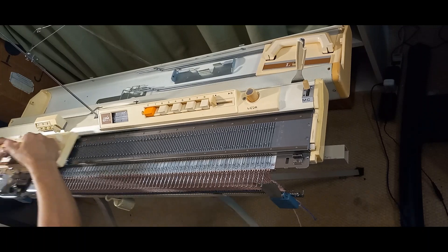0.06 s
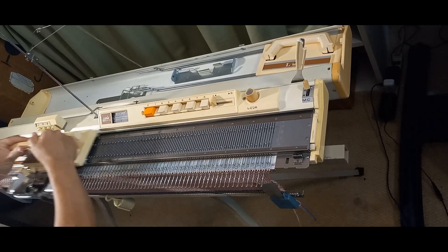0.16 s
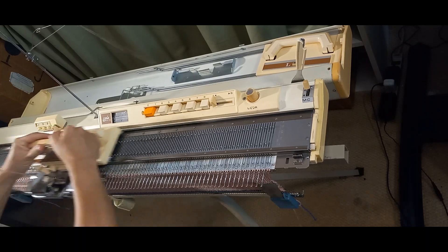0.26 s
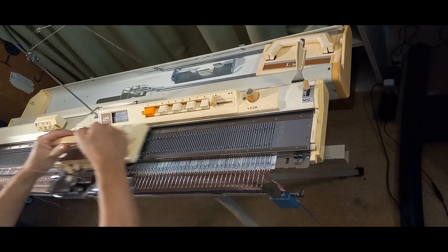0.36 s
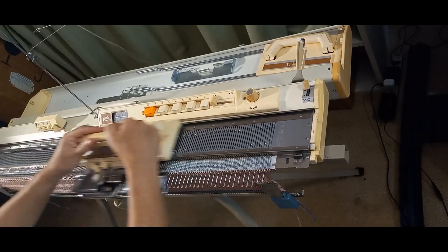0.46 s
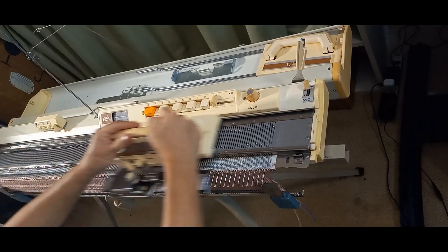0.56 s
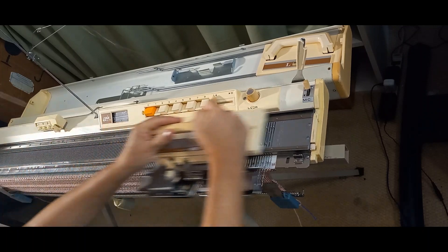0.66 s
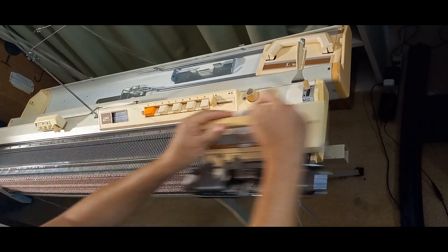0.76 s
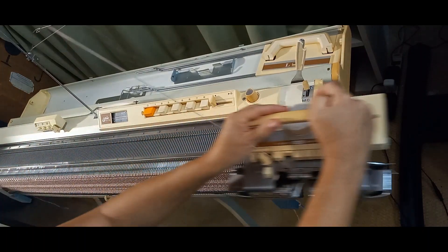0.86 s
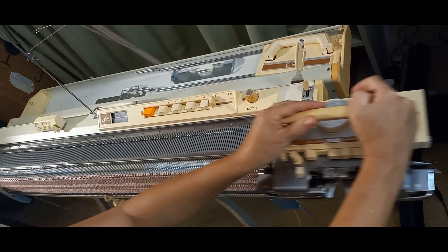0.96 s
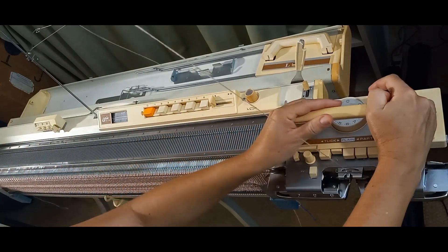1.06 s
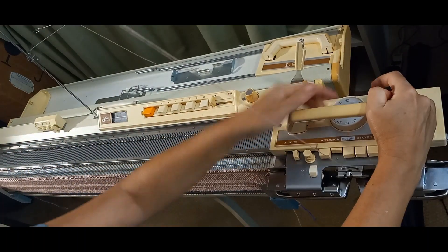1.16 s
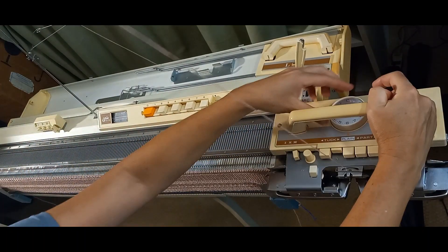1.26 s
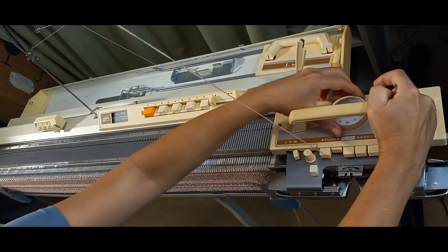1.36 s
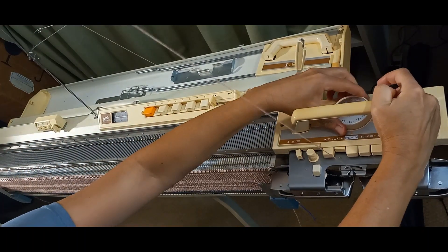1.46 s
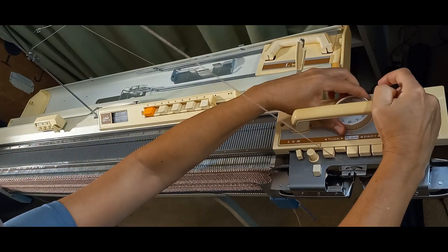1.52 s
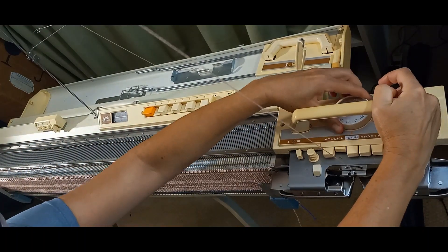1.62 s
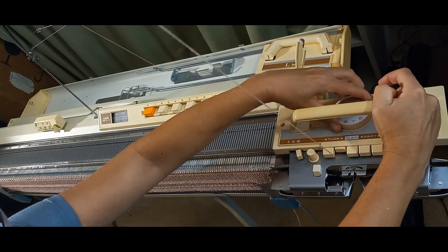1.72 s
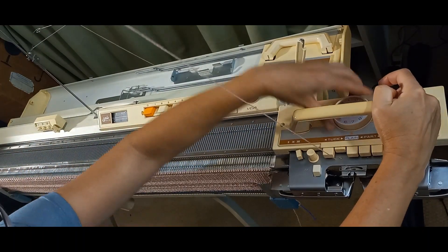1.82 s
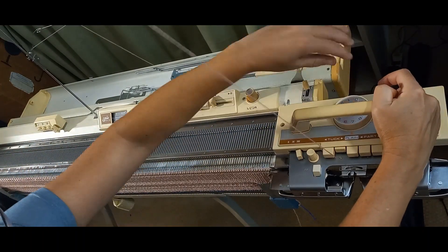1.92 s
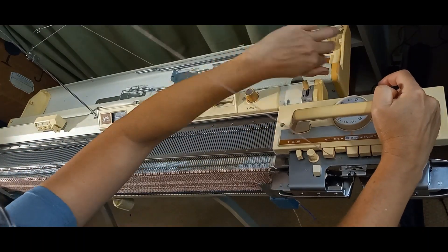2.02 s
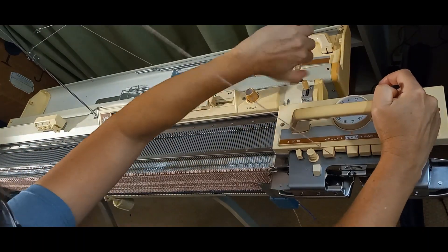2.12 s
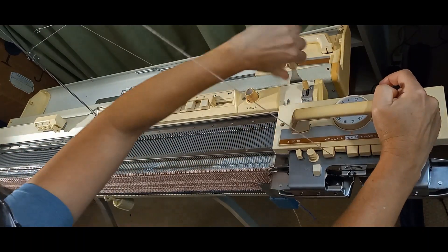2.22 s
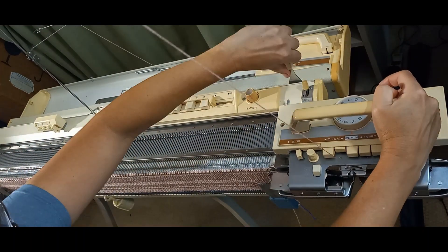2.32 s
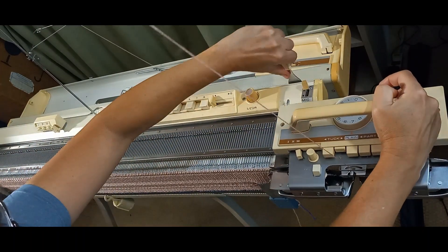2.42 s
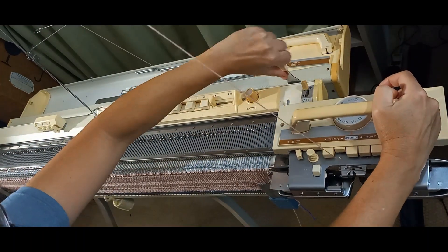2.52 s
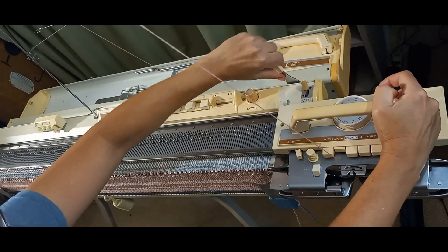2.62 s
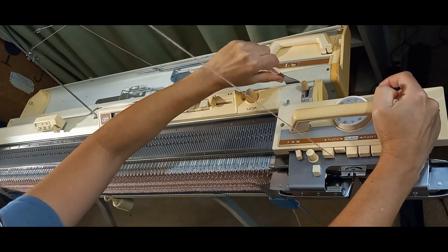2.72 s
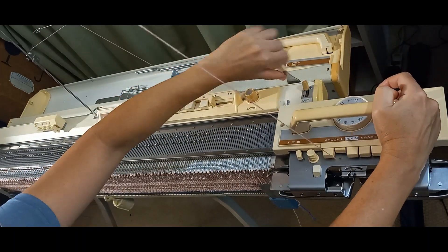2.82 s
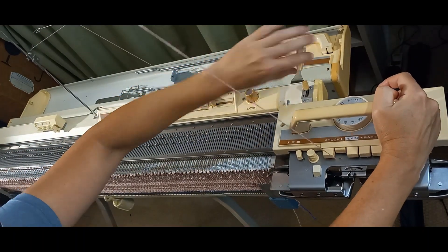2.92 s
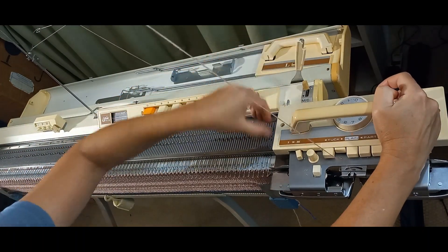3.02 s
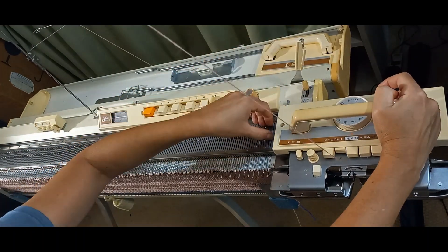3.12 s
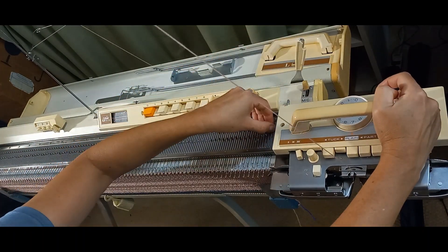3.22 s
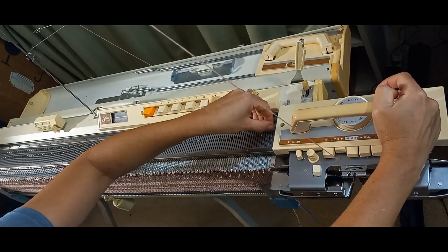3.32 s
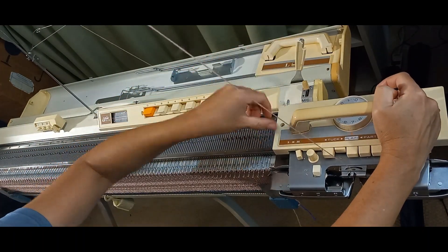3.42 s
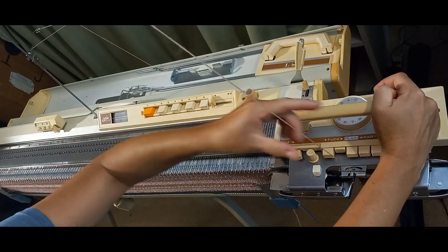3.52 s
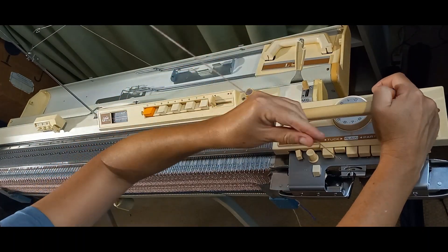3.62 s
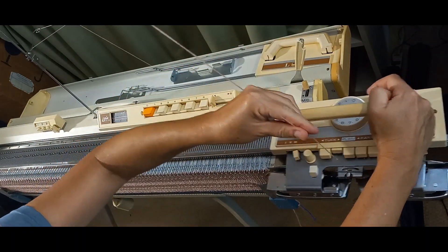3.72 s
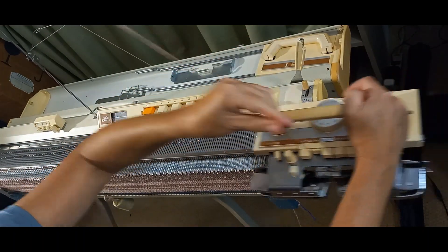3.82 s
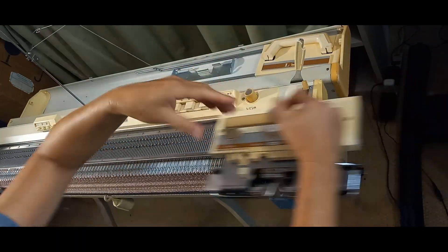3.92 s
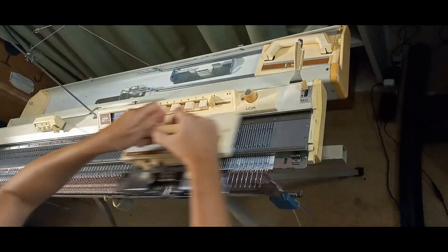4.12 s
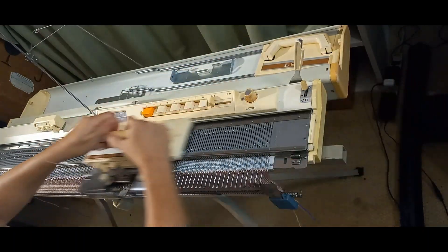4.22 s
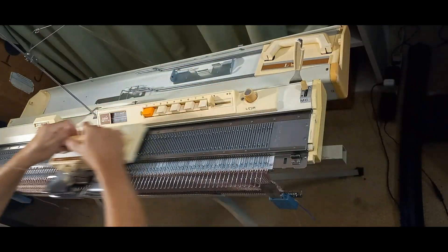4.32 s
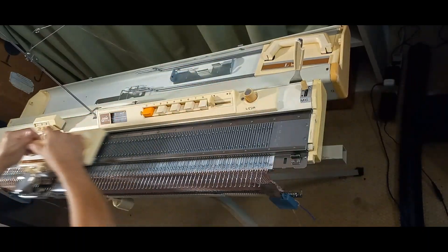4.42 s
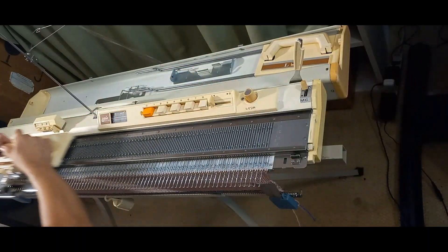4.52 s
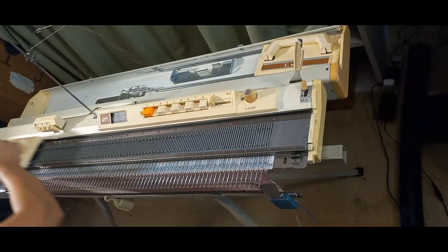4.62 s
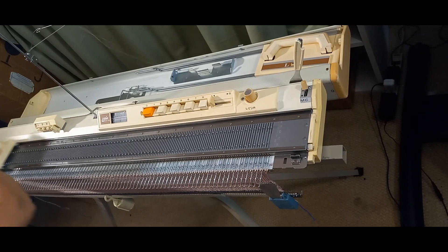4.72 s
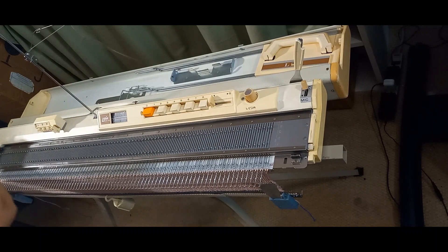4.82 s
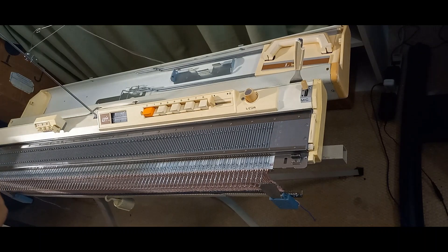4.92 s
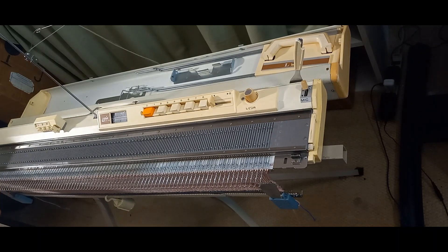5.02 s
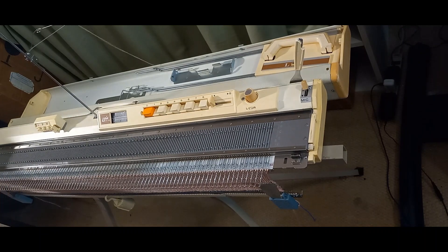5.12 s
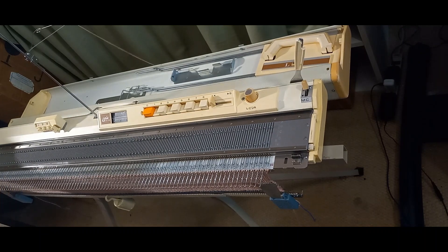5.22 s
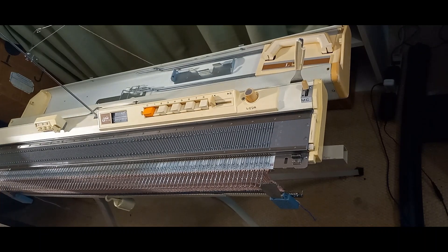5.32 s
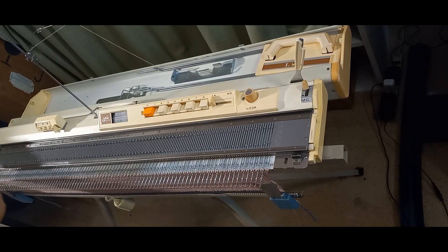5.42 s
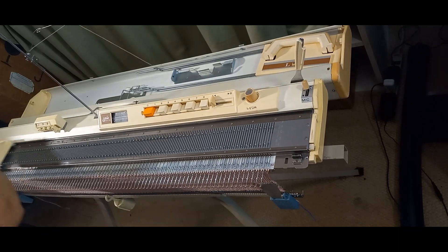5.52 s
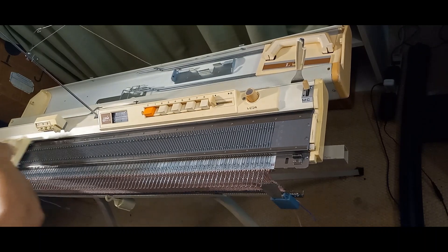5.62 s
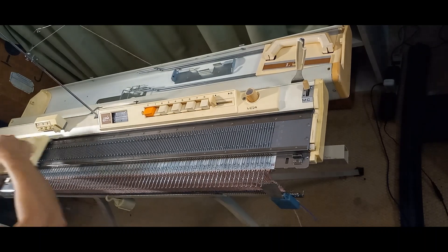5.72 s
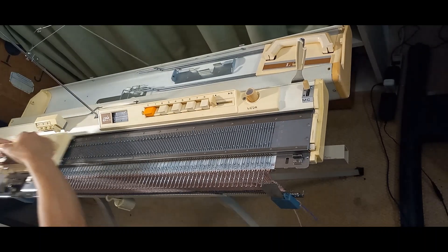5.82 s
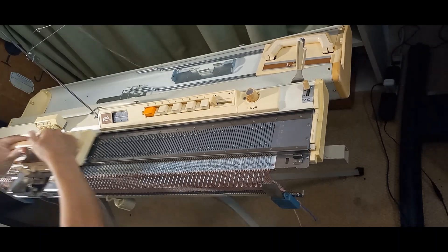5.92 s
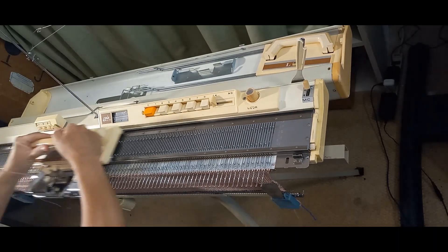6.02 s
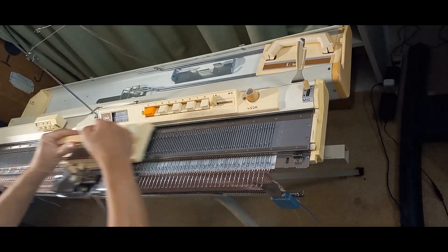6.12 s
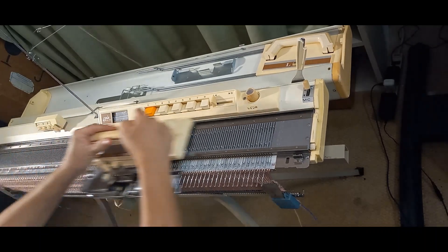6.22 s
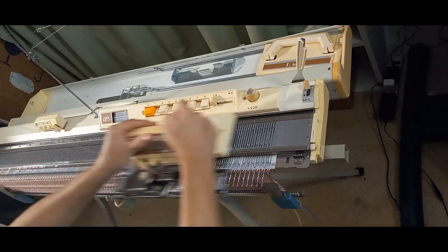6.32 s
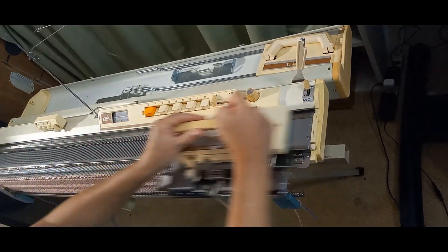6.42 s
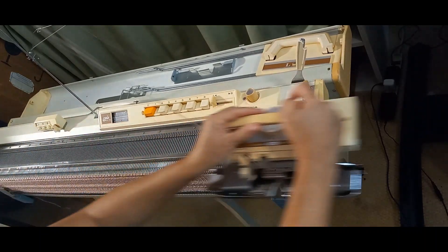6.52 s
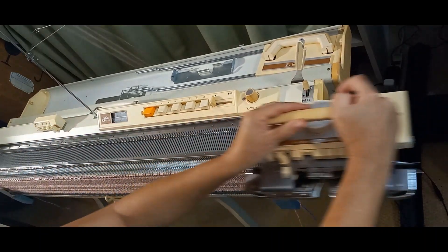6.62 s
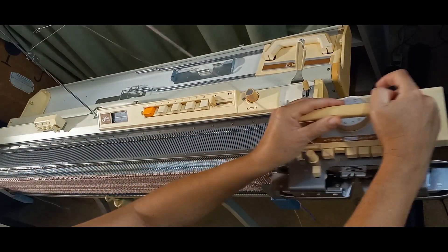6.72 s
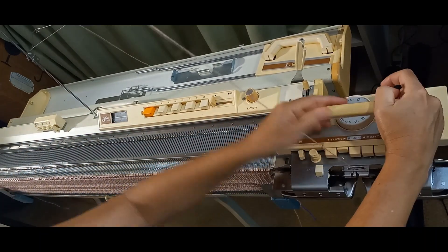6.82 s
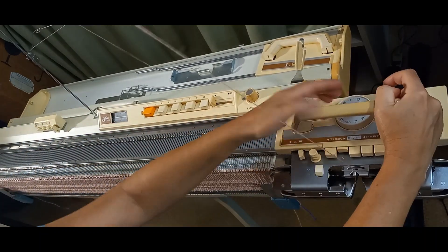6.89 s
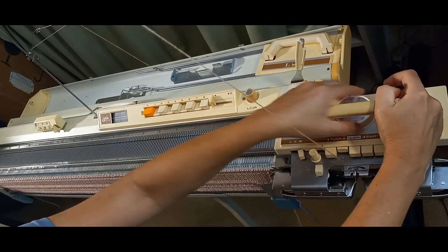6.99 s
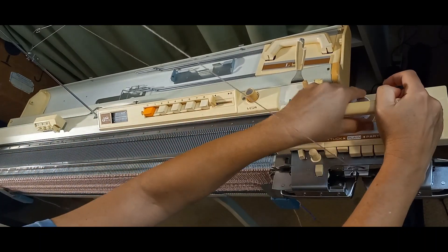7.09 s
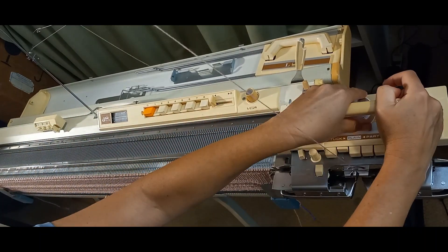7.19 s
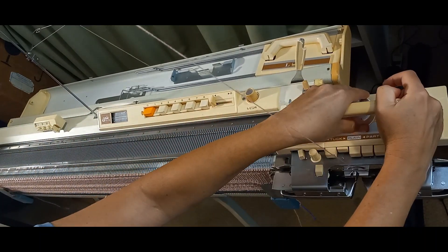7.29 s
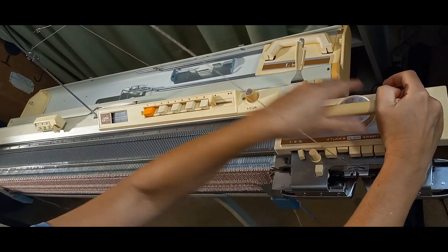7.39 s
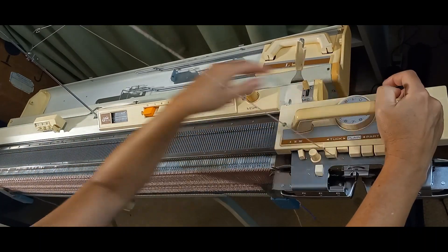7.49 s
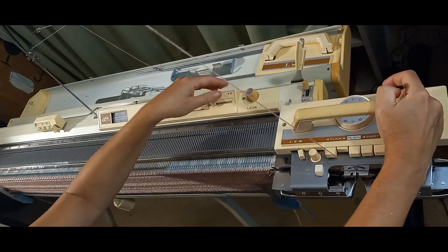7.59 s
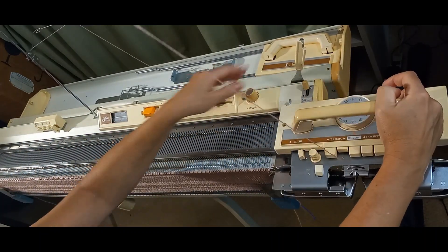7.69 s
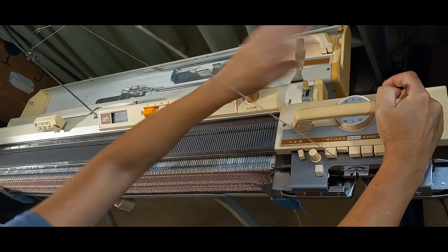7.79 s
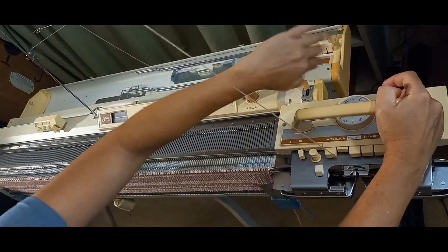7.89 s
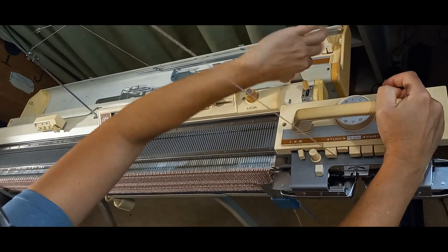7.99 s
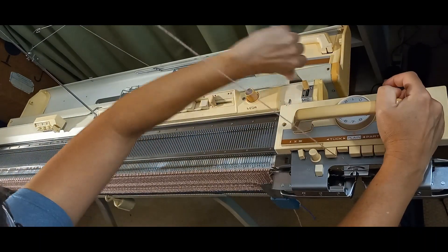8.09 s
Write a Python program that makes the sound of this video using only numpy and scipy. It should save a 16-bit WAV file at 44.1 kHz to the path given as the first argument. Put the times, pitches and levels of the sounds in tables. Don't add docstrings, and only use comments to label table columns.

```python
import sys
import numpy as np
from scipy import signal
from scipy.fft import rfft, irfft, next_fast_len
from scipy.io import wavfile
from scipy.ndimage import uniform_filter1d, map_coordinates

SR = 44100
rng = np.random.default_rng(int(sys.argv[2]) if len(sys.argv) > 2 else 0)


def to_wav(s):
    ch = np.atleast_2d(s).T
    pcm = np.round(np.clip(ch, -1, 1) * 32767)
    wavfile.write(sys.argv[1], SR, pcm.astype(np.int16))


def invert_db(x):
    u = np.asarray(x, float) / 20
    return 10 ** u


N = 359415
TIME = np.arange(N) / SR
FREQ = np.fft.rfftfreq(next_fast_len(N, True), 1 / SR) + 1

# frequency_hz, density_db (per Hz)
HUM_SPECTRUM = [(15, -86), (25, -58.5), (43, -29), (75, -39), (96, -17), (175, -0.5), (425, -12.5),
                (535, -10.5), (589, -9.5), (1010, -19.5), (1510, -36.5), (2500, -55), (3250, -76),
                (5500, -120)]
# frequency_hz, density_db (per Hz)
HISS_SPECTRUM = [(710, -60), (1200, 8), (1380, 5), (3380, -4), (3570, -2.5), (4880, -6), (7190, -8.5),
                 (8270, -5.5), (15800, -11.5)]
# time_s, gain_db
ROOM_GAIN = [(0.0, 0), (0.38, -13), (0.86, -29), (0.95, -8.5), (1.34, -10.5), (1.77, 0.2), (2.97, 0.8),
             (3.38, -2.5), (3.9, 1), (4.45, -19), (4.88, -5.5), (5.29, -9.5), (5.67, 5), (6.31, -42),
             (6.63, -9), (7.15, -11), (7.48, -0.1), (8.15, 0.2)]
# centre_s, length_s, level_db
SLEEVE_BRUSHES = [
    (2.67, .35, -48),
    (7.355, 0.21, -55),
    (8.15, 0.23, -56),
]
# frequency_hz, likeness (0-1)
PORT_LIKENESS = [(60, .15), (130, .4), (290, .75), (640, .7), (1400, .6), (3100, .25), (6000, .05),
                 (15000, 0)]
# centre_s, length_s, pitch_hz, level_db
SINGING_PARTS = [(.46, .14, 4300, -31), (.85, 0.14, 5900, -30), (6.43, .1, 4240, -30),
                 (6.59, 0.11, 5620, -28), (6.6, 0.08, 2310, -35), (3.925, .04, 10150, -30.5),
                 (2.962, 0.05, 1890, -35), (2.713, .018, 3110, -44), (.389, 0.0062, 2970, -24),
                 (4.4815, 0.008, 1800, -22), (4.483, .012, 2300, -24), (6.152, 0.008, 2600, -22),
                 (3.0, .03, 740, -30), (5.042, .025, 680, -38)]
# start_s, pitch_hz, level_db, t60_s
RINGING_WIRE = [
    (.93, 10460, -46, .5),
    (6.655, 10480, -46, .55),
]
# time_s, peak_db, knock_db (re peak), top_db (re peak)
SNAP_EVENTS = [(0.9597, -13, -33, -2), (1.0024, -49, -1, -12), (1.065, -41.5, -3, -16),
               (1.0774, -47, -2, -18), (1.3265, -28.5, -8.5, -8), (1.8749, -18, -7.5, -6),
               (1.9837, -23, -4, -20), (2.2574, -38, 9, -14), (2.3151, -16, -9.5, -7.5),
               (2.4768, -42, -4, 3), (3.8434, -29.5, -2, -5), (3.8545, -15.5, -7, -6),
               (3.8995, -25, -25, 1), (3.9185, -13.5, -21, 1.5), (4.9108, -17, -15, -2.5),
               (5.2753, -31.5, 0, -4), (5.3905, -28.5, 2, -8), (5.465, -22.5, -4.5, 1.5),
               (6.6785, -11, -19, -5.5), (6.7034, -40, 12.5, -6), (6.8174, -48, 5, -21),
               (6.9225, -49.5, 4.5, -0.5), (7.0785, -27.5, -8.5, -8), (7.424, -45, 10.5, -8),
               (7.4951, -14.5, -7.5, -6), (8.1256, -27, -4, 1)]
# time_s, peak_db, knock_db (re peak), top_db (re peak)
SLIDE_EVENTS = [(1.1383, -59, 12, -13), (2.0044, -21.5, -4, 1.5), (2.141, -39, 7, -17.5),
                (2.3267, -33, 4, -6), (2.4454, -53, 9, -13), (2.8723, -16, -7, -2), (2.9546, -39, -9, 2),
                (2.968, -30, -13, -1), (2.9856, -10.5, -5, -0.5), (3.3005, -39, -6, -4),
                (3.8614, -23, -4.5, -5), (4.9894, -45.5, -15, 2), (5.0324, -29.5, 1, -2.5),
                (5.492, -24, -1, 1.5), (5.5503, -21.5, -1, 5.5), (7.3377, -41, -0.5, -20),
                (8.0989, -36.5, 1, -8)]
# time_s, peak_db, knock_db (re peak), top_db (re peak)
RUB_EVENTS = [
    (2.745, -31, 1.5, -2.5),
    (2.82, -29, -0.5, -3.5),
    (2.94, -26.5, 3, -6.5),
]
# pitch_hz, level_db, t60_s
SHELL_MODES = [(1173, 7, 0.1), (2030, -24.5, 0.09), (4010, 2.5, 0.041), (6100, -28.5, 0.075),
               (7150, -0.5, 0.012), (10370, -2.5, 0.013)]
# frequency_hz, density_db (per Hz)
TICK_SPECTRUM = [(59, -61), (100, -44), (170, -12), (238, -16.5), (271, -4), (314, -24.5), (422, -3),
                 (500, -15), (605, -4), (814, -8.5), (905, -6), (1860, -1.5), (3300, -5.5), (8370, -3),
                 (15800, -4.5)]
# pitch_hz, width_hz, level_db
BED_MODES = [(289, 11, -10), (640, 21, 15), (1820, 260, 9), (2510, 370, 6), (4280, 340, 8),
             (8400, 130, -3.5)]
# time_s, tick_level_db
PASSES = [
    [(0.0, -19), (0.126, -20), (0.4, -20.5), (0.91, -20), (0.925, -29), (0.95, -48.5), (0.975, -39),
     (0.997, -54), (1.05, -65)],
    [(3.898, -26), (3.914, -29), (3.921, -23.5), (3.979, -15.5), (4.107, -20), (4.8, -22), (4.879, -33),
     (4.925, -42), (4.995, -55)],
    [(5.495, -29), (5.521, -29.5), (5.573, -17), (5.8, -20), (6.63, -20.5), (6.655, -30.5), (6.69, -38),
     (6.74, -51), (6.76, -70)],
]
# centre_s, length_s, shell_db, rumble_db
STIFF_SPOTS = [
    (0.13, 0.097, 3.5, 5),
    (0.394, 0.039, 4.5, 5),
    (4.48, 0.017, 6, 1.5),
    (4.63, 0.16, 3.5, 4),
    (4.83, 0.047, 1, 4),
    (5.78, 0.18, 3.5, 3),
    (6.15, 0.046, 2, -0.5),
]


def over_hz(table):
    hz, value = np.transpose(table)
    return np.interp(np.log(FREQ), np.log(hz), value)


def unit(x):
    return x / np.sqrt(np.mean(x ** 2))


def band(x, lo_hz, hi_hz):
    return signal.sosfilt(signal.butter(3, [lo_hz, hi_hz], "band", fs=SR, output="sos"), x)


def ring(x, hz, t60):
    r = np.exp(-np.log(1000) / (t60 * SR))
    return signal.lfilter([1 - r, 0, r - 1], [1, -2 * r * np.cos(2 * np.pi * hz / SR), r * r], x)


def swell(centre_s, length_s):
    return np.exp(-((TIME - centre_s) / length_s) ** 2)


def walk(rate_hz):
    hold = int(SR / rate_hz)
    held = np.repeat(rng.standard_normal(N // hold + 1), hold)
    return 1.2 * uniform_filter1d(held, hold)[:N]


def noise(alike, colour=((1, 0), (SR, 0))):
    port_lag_s = .00006
    mid, side = rfft(rng.standard_normal((2, 2 * len(FREQ) - 2)))
    alike, ear = np.clip(alike, 0, .99), np.array([[1], [-1]])
    lag = np.exp(1j * np.pi * FREQ * port_lag_s * ear)
    ports = np.sqrt(1 + alike) * mid + np.sqrt(1 - alike) * side * ear
    return irfft(ports * lag * invert_db(over_hz(colour)))[:, :N]


def push_level(off_db=-70):
    on = sum((TIME >= t[0][0]) & (TIME <= t[-1][0]) for t in PASSES)
    level_db = np.interp(TIME, *np.concatenate(PASSES).T)
    return level_db + off_db * (1 - uniform_filter1d(1. * on, size=400))


def room():
    hum_db, hiss_db, hiss_follows = -43.5, -49.5, 0.98
    echo_db, echo_t60_s = -20, 0.54
    gain_db = np.interp(TIME, *np.transpose(ROOM_GAIN))
    hum = noise(0.17, HUM_SPECTRUM)
    hum = hum / np.std(band(hum, 110, 390)) * invert_db(hum_db + gain_db + 1.2 * walk(8))
    fade = np.exp(-2 * np.log(1000) / (echo_t60_s * SR))
    echo_power = signal.lfilter([1 - fade], [1, -fade], invert_db(push_level() + echo_db) ** 2)
    sleeve = sum(invert_db(db) * swell(s, length) for s, length, db in SLEEVE_BRUSHES)
    hiss_power = invert_db(hiss_db + hiss_follows * gain_db) ** 2 + echo_power + sleeve ** 2
    hiss_level = np.sqrt(hiss_power) * invert_db(.8 * walk(13))
    return hum + unit(noise(0, HISS_SPECTRUM)) * hiss_level


def springs():
    scrape, out = noise(.2), np.zeros((2, N))
    for s, length, hz, db in SINGING_PARTS:
        near = np.abs(TIME - s) < length
        envelope = np.exp(-((TIME[near] - s) / length * 2) ** 4)
        out[:, near] += invert_db(db) * envelope * unit(ring(scrape[:, near], hz, 0.0097))
    for s, hz, db, t60 in RINGING_WIRE:
        on = (TIME > s) & (TIME < s + t60)
        decay = invert_db(db - 60 * (TIME[on] - s) / t60)
        out[:, on] += decay * unit(ring(scrape[:, on], hz, 0.032))
    return out


def blows(table, rise_s, t60, tip_db, tail_db):
    shape, t = np.zeros((3, N)), np.arange(int(SR / 4)) / SR
    after = np.clip(t - rise_s, 0, None)
    fall = invert_db(-60 * after / (t60 * np.array([[1.7], [1.], [.85]])))
    tail = invert_db(tail_db - 60 * after / 0.16)
    tip = invert_db(tip_db - 60 * after / .005)
    envelope = np.clip(t / rise_s, 0, 1) * (fall + tail + tip)
    for s, db, low_db, top_db in table:
        i = int((s - rise_s / 2) * SR)
        level = invert_db(db + np.array([[low_db], [0], [top_db]]))
        shape[:, i:i + len(t)] += (envelope * level)[:, :N - i]
    return shape


def clicks():
    grit = noise(over_hz(PORT_LIKENESS)) * invert_db(1.2 * walk(800))
    snap = invert_db(-5.0) * blows(SNAP_EVENTS, .0013, t60=0.04, tip_db=0.5, tail_db=-10.5)
    slide = invert_db(-1.5) * blows(SLIDE_EVENTS, .009, t60=0.087, tip_db=-13.0, tail_db=-15.5)
    slide = slide + invert_db(-2.5) * blows(RUB_EVENTS, .022, t60=0.037, tip_db=-32.5, tail_db=-14.5)
    shape = snap + slide
    knock = unit(band(grit, 600, 1570))
    low = unit(band(grit, 800, 3220))
    mid = unit(band(grit, 2900, 8450))
    top = unit(band(grit, 8300, 14200))
    crack = invert_db(-2.0) * knock * snap[0] + low * slide[0]
    crack = invert_db(-7.5) * (crack + mid * shape[1] + top[:, ::-1] * shape[2])
    drive = crack * (snap[1] + 0.4 * slide[1]) / (shape[1] + 1e-9)
    shell = sum(invert_db(db) * ring(drive, hz, t60) for hz, db, t60 in SHELL_MODES)
    thud = invert_db(-39.5) * unit(band(grit, 22, 63)) * uniform_filter1d(shape[1], size=1500)
    return crack + shell + thud


def drifting(x, lo_hz, hi_hz, depth_db, wide=1):
    gap_hz, gap_s, drift_hz_per_s = 78, .05, 220
    hz, s, cells = signal.stft(x, SR, nperseg=2048, noverlap=1664)
    inside = (hz >= lo_hz) & (hz < hi_hz)
    slide_hz = np.interp(s, TIME, np.cumsum(walk(4))) / SR * drift_hz_per_s
    pitch_place = (hz[inside, None] + slide_hz) / gap_hz / wide
    place = np.broadcast_arrays(pitch_place, s / gap_s * np.sqrt(wide))
    field = map_coordinates(rng.standard_normal((60, 600)), place, order=3, mode="mirror")
    gain = np.zeros(cells.shape[1:])
    gain[inside] = invert_db(-depth_db * np.clip(5 * (field - .25), 0, 1))
    return unit(signal.istft(cells * gain, SR, noverlap=1664)[1][:, :N])


def carriage():
    needles_per_s, ticks_per_s, cruise_db = 160, 2500, -21
    gap_db = 40
    tick_db = push_level()
    slack_db = np.clip(cruise_db - tick_db, 0, 40)
    shell_db = -10 + 0.27 * slack_db + sum(db * swell(s, length) for s, length, db, _ in STIFF_SPOTS)
    rumble_db = -19.5 + 0.69 * slack_db + sum(db * swell(s, length) for s, length, _, db in STIFF_SPOTS)
    chance, size = rng.random(N), rng.exponential(size=N)
    bunching = 1 + .25 * np.cos(2 * np.pi * needles_per_s * TIME)
    ticks = (chance < ticks_per_s * bunching / SR) * invert_db(2.02 * size)
    power = signal.lfilter([1], [1, -np.exp(-1 / (0.00054 * SR))], ticks ** 2)
    body = np.sqrt(power / power.mean() + 3.0) * noise(over_hz(PORT_LIKENESS), TICK_SPECTRUM)
    modes = sum(invert_db(-10.0 + 0.36 * db) * ring(body, hz, np.log(1000) / np.pi / width)
                for hz, width, db in BED_MODES)
    body = body + modes
    rumble = drifting(body, 105, 1235, gap_db)
    shell = drifting(body, 1235, 3000, gap_db / 4)
    needles = drifting(body, 3000, 18000, gap_db / 12, wide=12)
    return invert_db(tick_db) * (needles + shell * invert_db(shell_db) + rumble * invert_db(rumble_db))


def scene():
    low_pass = signal.ellip(10, .2, 60, 15950, fs=SR, output="sos")
    steady = signal.sosfilt(low_pass, carriage() + room())
    return steady + springs() + clicks()


def band_limit(x):
    return signal.sosfilt(signal.butter(12, 17090, fs=SR, output="sos"), x)


def record(dry):
    change_s, hold_s, fade_s = 6.975, .006, 0.03
    dip = np.clip((np.abs(TIME - change_s) - hold_s) / fade_s, .002, 1) ** 1.4
    return band_limit(dry * dip)


dry = scene()
out = record(dry)
to_wav(out)
```